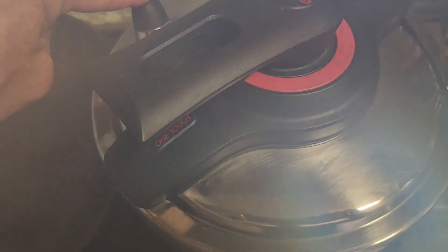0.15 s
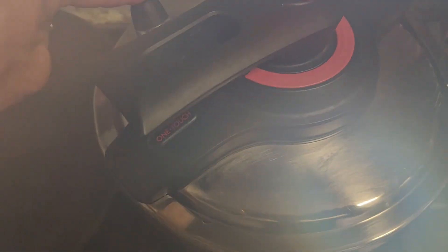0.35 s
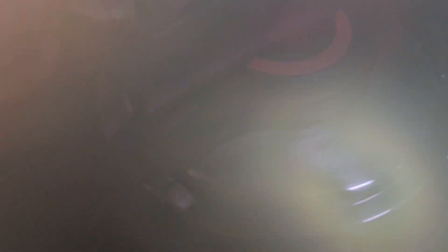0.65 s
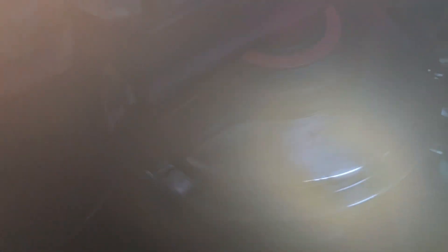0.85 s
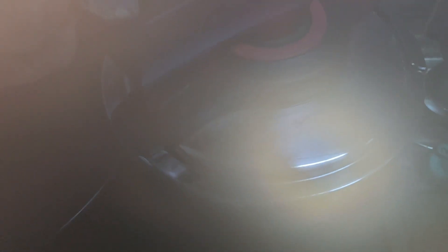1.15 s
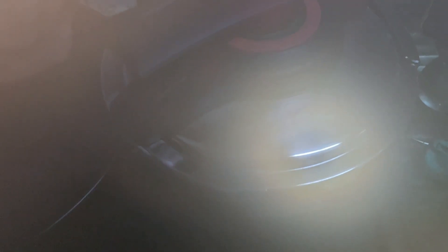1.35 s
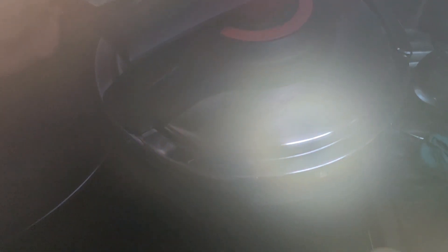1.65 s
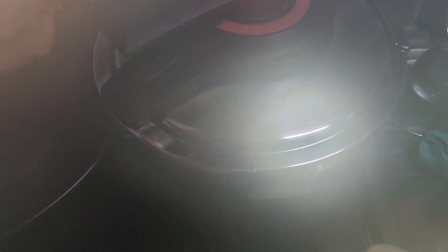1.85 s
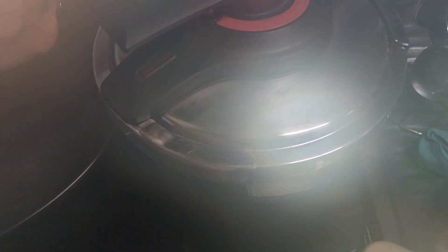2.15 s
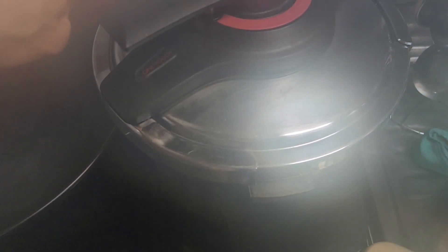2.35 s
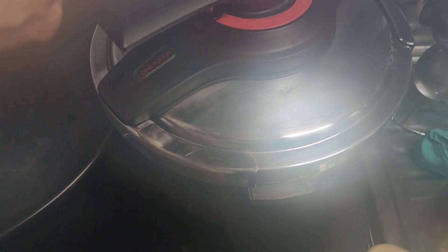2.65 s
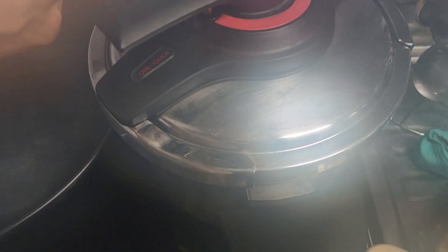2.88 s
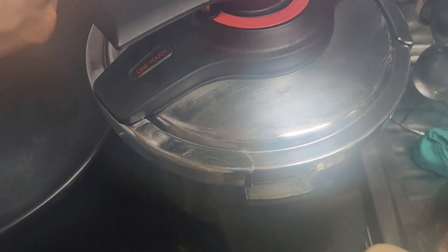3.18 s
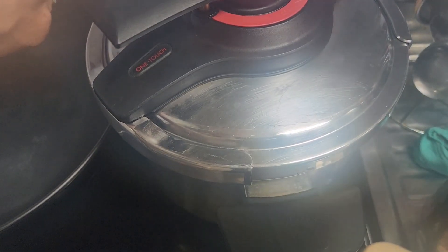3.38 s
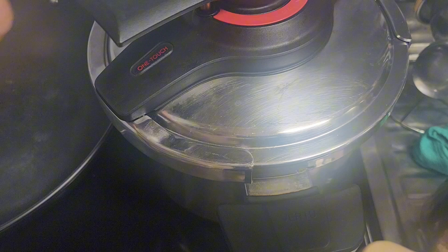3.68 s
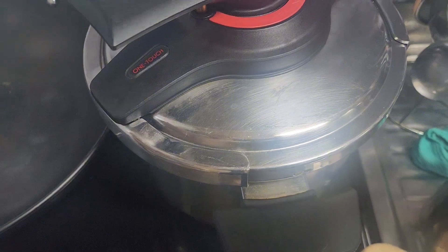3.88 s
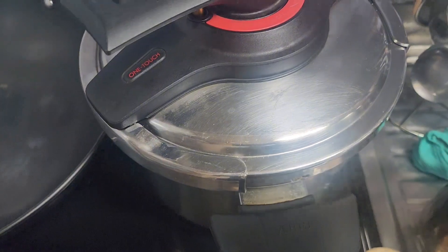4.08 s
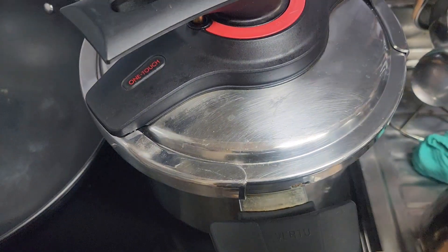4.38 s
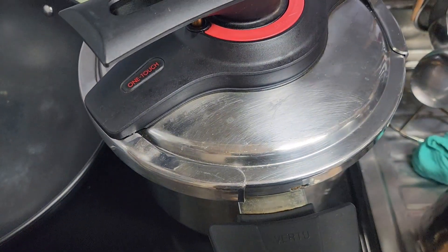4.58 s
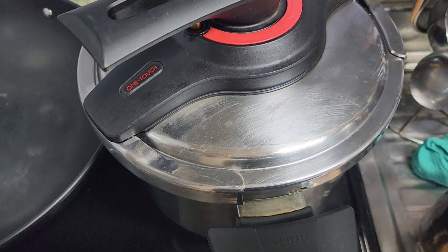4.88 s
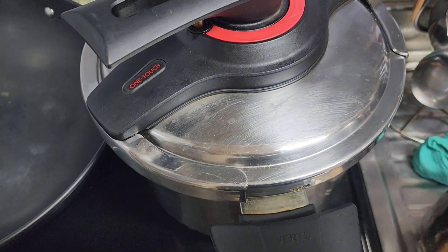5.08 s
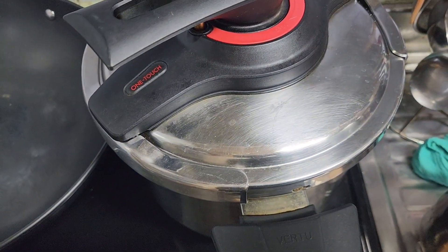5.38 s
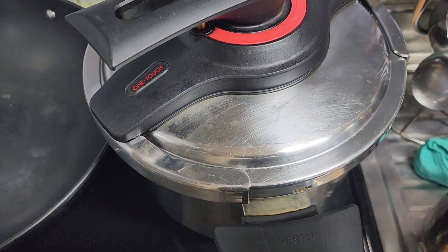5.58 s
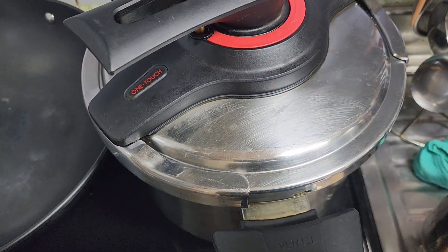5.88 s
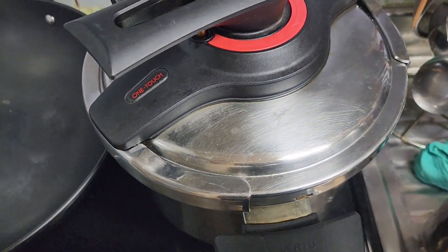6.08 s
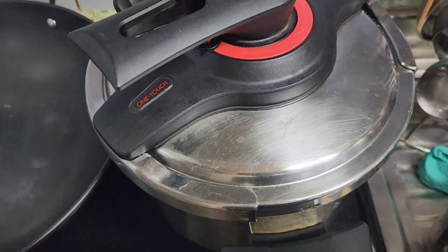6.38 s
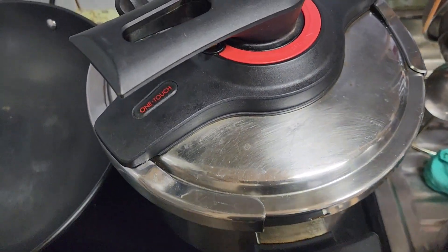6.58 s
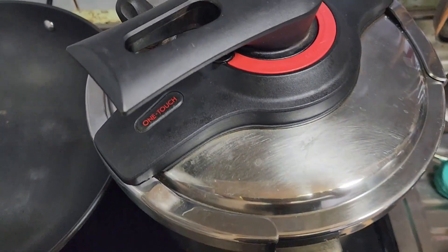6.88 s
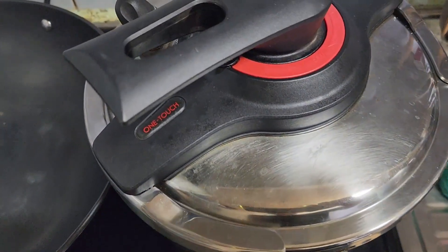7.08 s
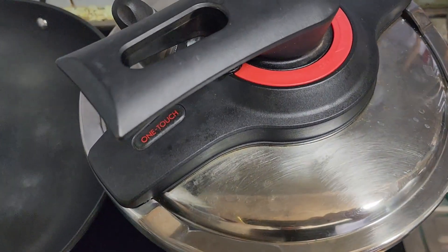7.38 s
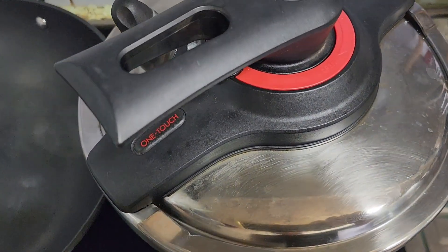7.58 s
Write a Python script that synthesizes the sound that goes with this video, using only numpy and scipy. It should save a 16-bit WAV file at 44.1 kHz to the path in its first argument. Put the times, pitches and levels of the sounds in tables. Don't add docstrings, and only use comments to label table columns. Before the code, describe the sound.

Loud, whistly-edged steam rushes from a stovetop cooker, recorded very close by a handheld phone in a small room. The jet sags under a nudge of the valve, recovers, then chokes abruptly with plastic clicks and a hollow pot thump. Thin leaking spits and refrigerator hum show through the gap. Loud cracks and a burst of steam restart the hiss, which holds nearly steady, slightly softer, changing colour near the end.

```python
import sys
import numpy as np
from scipy import signal
from scipy.fft import rfft, irfft, next_fast_len
from scipy.io import wavfile
from scipy.ndimage import uniform_filter1d

SR = 44100
rng = np.random.default_rng(int(sys.argv[2]) if len(sys.argv) > 2 else 0)


def store_wav(level_fs):
    pcm = np.round(np.clip(np.atleast_2d(level_fs), -1, 1) * 32767)
    wavfile.write(sys.argv[1], SR, pcm.T.astype(np.int16))


def ratio(d):
    e = np.asarray(d, float) / 20
    return 10 ** e


N = 341334

NUDGE_S, SNAP_S = 1.331, 2.529
OPPOSITE = np.array([[1], [-1]])


def seconds(count=N):
    return np.arange(count) / SR


def colour(x, shape):
    hz, db = np.transpose(shape)
    size = next_fast_len(x.shape[-1])
    bins = np.maximum(np.arange(size // 2 + 1) * SR / size, 1)
    gain = ratio(np.interp(np.log(bins), np.log(hz), db))
    return irfft(rfft(x, size) * gain, size)[..., :x.shape[-1]]


def unit(x):
    return x / np.sqrt(np.mean(x ** 2))


def walk(rate):
    hold = int(SR / rate)
    steps = np.repeat(rng.standard_normal(N // hold + 1), hold)
    return 1.3 * uniform_filter1d(uniform_filter1d(steps, hold), hold)[:N]


def decay(t, t60):
    return np.exp(-np.log(1000) * t / t60)


def room(x):
    stove_t60_s, room_t60_s, walls_db = .07, .25, -8
    t = seconds(SR // 3)
    fade = decay(t, stove_t60_s) + ratio(walls_db) * decay(t, room_t60_s)
    tail = rng.standard_normal((2, len(t))) * (t > .0015) * fade
    tail = tail / np.sqrt(np.sum(tail ** 2, axis=1, keepdims=True))
    return signal.oaconvolve(x[None], tail, axes=1)[:, :N]


def echoes(x):
    # delay [ms], gain [ratio]
    echo_left = [(0.88, -0.06), (1.07, 0.06), (1.16, -0.05), (1.45, 0.05), (1.84, -0.07), (1.95, -0.03),
                 (2.04, 0.09), (2.22, -0.03), (2.49, 0.05), (2.59, -0.05), (3.06, 0.03), (3.27, 0.03),
                 (3.38, -0.04), (4.42, -0.04)]
    echo_right = [(0.45, 0.04), (0.79, -0.04), (0.91, 0.08), (1.0, -0.04), (1.22, 0.07), (1.61, -0.04),
                  (1.84, 0.05), (1.93, -0.05), (2.13, 0.04), (2.83, -0.06), (3.04, 0.04), (3.58, 0.04),
                  (4.63, -0.04), (5.51, -0.05)]
    right_lag_ms, strength = .32, 2.19
    path = np.zeros((2, 512))
    for port, (table, lag_ms) in enumerate([(echo_left, 0), (echo_right, right_lag_ms)]):
        path[port, round(lag_ms * SR / 1000)] = 1
        ms, gain = np.transpose(table)
        path[port, np.round((ms + lag_ms) * SR / 1000).astype(int)] = strength * gain
    return signal.oaconvolve(x[None], path, axes=1)[:, :N]


def kitchen():
    # f/Hz, level/dB [per Hz]
    wash_colour = [(260, -31), (450, -5), (605, -11), (814, -7), (986, -2), (2100, -11.5), (4030, -25),
                   (4960, -20), (11200, -48), (15500, -50.5)]
    # f/Hz, level/dB [per Hz]
    rumble_colour = [(20, -5.5), (42, 4.5), (52, -20), (85, -14), (118, -4.5), (135, -7), (160, -11.5),
                     (205, -21), (250, -13.5), (280, -13.5), (310, -3), (340, -14), (450, -14.5),
                     (520, -44)]
    # f/Hz, level/dB
    hum_tones = [(59.2, -46.5), (145.3, -60.5), (296.1, -67.5)]
    # period [s], crest t/s, depth level/dB
    hum_beats = [(6.3, 0.68, 1.5), (2.5, 1.7, 1.5)]
    wash_db, rumble_db = -50.5, -51
    t = seconds()

    mid, side = colour(rng.standard_normal((2, N)), wash_colour)
    wash = ratio(wash_db) * (mid + 0.41 * side * OPPOSITE) / np.std(mid)

    mid, side = colour(rng.standard_normal((2, N)), rumble_colour)
    side = colour(side, [(150, -10), (400, -17)])
    rumble = ratio(rumble_db) * (mid + side * OPPOSITE) / np.std(mid)

    swell_db = sum(db * np.cos(2 * np.pi * (t - crest_s) / period) for period, crest_s, db in hum_beats)
    hum = np.zeros(N)
    for hz, db in hum_tones:
        level = np.sqrt(2) * ratio(db + swell_db + 0.39 * walk(6))
        wobble = hz / 160 * walk(7.0)
        hum += level * np.sin(2 * np.pi * hz * t + wobble)
    return wash + (rumble + hum) * ratio(.75 * OPPOSITE)


def valve():
    # t/s, level/dB
    pressure = [
        (0, -21.5),
        (.4, -23),
        (1.2, -23),
        (1.9, -24.5),
        (3.3, -24.5),
        (4.5, -25),
        (6.5, -25),
        (7.74, -24.5),
    ]
    close_s, hold_s, open_s, nudge_to_db, hold_to_db = 0.087, 0.19, 0.096, -6, -4
    shut_s, shut_db_per_s2 = 1.986, -4600
    puff_db, puff_s, puff_dull_db, puff_pan_db = 9, 0.043, -9, -12
    bright_db, throttle_dull, pan_db = -0.32, .15, -1.22
    t = seconds()
    nudge_times = NUDGE_S + np.cumsum([0, close_s, hold_s, open_s])
    nudge_db = np.interp(t, nudge_times, [0, nudge_to_db, hold_to_db, 0])
    shut_db = np.where(t < SNAP_S, shut_db_per_s2 * np.maximum(t - shut_s, 0) ** 2, 0)
    puff = (t >= SNAP_S) * np.exp(-np.maximum(t - SNAP_S, 0) / puff_s)
    flow_db = np.interp(t, *np.transpose(pressure)) + nudge_db + np.maximum(shut_db, -60) + puff_db * puff
    tilt_db = bright_db + throttle_dull * nudge_db + puff_dull_db * puff
    return flow_db, tilt_db, pan_db + puff_pan_db * puff ** 2


def nozzle(noise):
    before_db, after_db, back_db_per_s = 2, -4.5, 1.26
    upper_db, upper_sag_db_per_s = 2, -0.45
    swing_s, swing_length_s = 6.8, .4
    t = seconds()
    lost_db = np.interp(t, [NUDGE_S - .3, NUDGE_S + .1], [before_db - after_db, 0])
    lower_ring_db = lost_db + after_db + back_db_per_s * np.maximum(t - NUDGE_S, 0)
    upper_ring_db = upper_db + upper_sag_db_per_s * t
    swing = np.clip((t - swing_s) / swing_length_s, 0, 1)
    for hz, db, swing_db in [(4780, lower_ring_db, -4), (5550, upper_ring_db, 0.5), (1850, 0, 2.5)]:
        band = colour(noise, [(hz - 320, -30), (hz - 150, 0), (hz + 150, 0), (hz + 320, -30)])
        noise = noise + band * (ratio(db + swing_db * swing) - 1)
    return noise


def jet():
    # f/Hz, width [Hz], level/dB
    resonances = [(2250, 71, 1), (3184, 300, 3), (3980, 56, -0.5), (4260, 36, -2.5), (4588, 82, 6),
                  (4840, 48, -7), (5140, 66, 3), (5570, 46, 8), (6530, 92, 4), (7655, 150, 5.5)]
    # f/Hz, level/dB [per Hz]
    port_left = [(350, -30.5), (700, -23), (1300, -15), (2100, -14.5), (3000, -8.5), (3900, -3.5),
                 (4800, 0), (5800, -4), (7000, -7), (8200, -11), (9400, -20), (10700, -21.5),
                 (13000, -19.5), (15400, -18.5)]
    port_right = [(350, -28), (700, -28), (1300, -15.5), (2100, -10), (3000, -14), (3900, -12.5),
                  (4800, -8.5), (5800, -13), (7000, -20), (8200, -16), (9400, -41), (10700, -16),
                  (13000, -46), (15400, -19)]
    jet_db, room_db, plume_db = 11.0, -4, -6.5
    flow_db, tilt_db, pan_db = valve()
    flutter_db = 0.35 * walk(12) + 0.24 * walk(70) + 0.89 * walk(400)

    noise = colour(rng.standard_normal((2, N)), [(200, -30), (400, 0)])
    for hz, width_hz, db in resonances:
        noise = colour(noise, [(hz - width_hz, 0), (hz, db), (hz + width_hz, 0)])
    noise = nozzle(noise)
    dull = colour(noise, [(1500, 0), (8000, -40)])
    low = dull * ratio(0.33 * walk(14) - tilt_db)
    high = (noise - dull) * ratio(0.35 * walk(25) + tilt_db)
    core, plume = (low + high) * ratio(flow_db + flutter_db)

    drift = .45 * seconds() + .15 * walk(.5)
    core_room = room(core) * np.cos(drift) + room(core) * np.sin(drift)
    far = ratio(room_db) * core_room + ratio(plume_db) * room(plume)
    left, right = (echoes(core) + far) * ratio(np.array([pan_db, -pan_db]) / 2)
    return ratio(jet_db) * np.array([colour(left, port_left), colour(right, port_right)])


def ring(modes, detune):
    t = seconds(SR // 2)
    out = np.zeros(len(t))
    for (hz, db, t60), factor in zip(modes, detune):
        out += ratio(db) * np.sin(2 * np.pi * hz * factor * t) * decay(t, t60)
    return out


def clicks():
    # t/s, peak level/dB, thump level/dB, contact [ms], hardness [dB per octave]
    knob_clicks = [(1.241, -31, -18, 13, 0), (1.263, -17, -26, 6.6, 5), (1.281, -29, -6, 55, -2.5),
                   (1.975, -14, -13, 2.2, 2.5), (1.981, -14, -8.5, 1.6, 0.5), (1.993, -21, -4, 11, -3),
                   (2.003, -16.5, -25, 6.3, -5), (2.011, -21, -15, 3.1, -1), (2.034, -16.5, -13, 8.3, 1),
                   (2.5287, -12.5, -36, 5.3, 17.5), (2.537, -8.5, -26, 9.6, 8),
                   (2.564, -14.5, -23, 7.1, -2.5), (2.576, -6, -25, 5.5, 2), (2.589, -18, -2, 8.4, -5),
                   (3.231, -28.5, -10, 11, 3)]
    # f/Hz, level/dB, t60 [s]
    handle_modes = [(463, -32, 0.035), (675, 1, 0.083), (785, -2, 0.03), (980, 4, 0.0077),
                    (1200, 2.5, 0.01), (1880, 1.5, 0.028), (2270, -4, 0.015), (2810, -7, 0.022),
                    (3160, 5.5, 0.011), (3585, 0, 0.032), (4740, -15, .02), (5670, -4, 0.018),
                    (6550, 4, 0.0096), (7030, -2, 0.017)]
    # f/Hz, level/dB, t60 [s]
    pot_modes = [(129, 9, 0.52), (165.8, 16.5, 0.24), (225, 5, 0.24), (275, -3, 0.16), (380, 10.5, 0.16)]
    crack_at_5ms_db, crack_db_per_doubling, crack_per_hard = 2.5, -6.5, 0.42
    rise_ms, push_s, room_db = 0.35, 0.00012, -1
    crack_colour = [(200, -50), (500, -25), (1200, -1), (2500, 6.5), (7000, -8.5), (10000, -5), (16000, -22)]
    out, t = np.zeros((2, N + SR)), seconds(SR // 10)
    for s, db, thump_db, ms, hard_db in knob_clicks:
        grit = rng.standard_normal((2, len(t)))
        detune = 1 + .008 * rng.standard_normal(len(handle_modes))
        contact_ms = max(ms, .3)
        fade = np.exp(-t * 1000 / contact_ms) * (1 - np.exp(-t * 1000 / rise_ms))

        scrape = colour(grit[0], [(300, -2 * hard_db), (2400, hard_db)]) * fade
        handle = signal.fftconvolve(ring(handle_modes, detune), scrape)
        pot = signal.fftconvolve(ring(pot_modes, 1 + (detune - 1) / 4), np.exp(-t / push_s))
        body = handle / np.abs(handle).max() + ratio(thump_db) * pot / np.abs(pot).max()
        hit = np.tile(body, (2, 1))

        crack_db = crack_at_5ms_db + crack_db_per_doubling * np.log2(contact_ms / 5)
        crack_db += crack_per_hard * hard_db
        hit[:, :len(t)] += ratio(crack_db) * colour(grit[::-1], crack_colour) * fade
        i = int(s * SR)
        out[:, i:i + hit.shape[1]] += hit * ratio(db + .8 * OPPOSITE)
    out = colour(out[:, :N], [(60, -30), (110, 0)])
    sent = colour(out.mean(axis=0), [(200, -13.5), (600, -2), (1200, 3), (2000, -4.5)])
    return out + ratio(room_db) * room(sent)


def spits():
    # t/s, level/dB, fade [s per 60 dB]
    spit_events = [
        (2.165, -50, .4),
        (2.275, -52, .12),
        (2.298, -53, 2.0),
        (2.325, -55, .4),
        (2.49, -56, .8),
    ]
    attack_s = 0.0033
    t = seconds()
    level = np.zeros(N)
    for s, db, fade_s in spit_events:
        fade_db = -60 * np.maximum(t - s, 0) / fade_s
        level += ratio(db + fade_db) * np.clip((t - s) / attack_s, 0, 1)
    return (t < SNAP_S + .01) * level


def leak():
    # f/Hz, level/dB
    leak_colour = [(2800, -16), (4300, -15), (5000, 0), (5500, -5), (6500, -11), (8500, -14), (10500, -29),
                   (15000, -28)]
    hiss = unit(colour(rng.standard_normal(N), leak_colour))
    spit = hiss * spits() * ratio(1.5 * walk(100))
    return echoes(spit) * ratio(np.array([[5.], [-3.]])) + ratio(-7) * room(spit)


def scene():
    return kitchen() + jet() + clicks() + leak()


def roll_off(x):
    return signal.sosfilt(signal.butter(12, 15830, fs=SR, output="sos"), x)


def record(dry):
    soft, top_hz = .7, 15740
    mix = colour(np.tanh(soft * dry) / soft, [(top_hz, 0), (top_hz + 60, -70)])
    return roll_off(mix)


dry = scene()
out = record(dry)
store_wav(out)
```